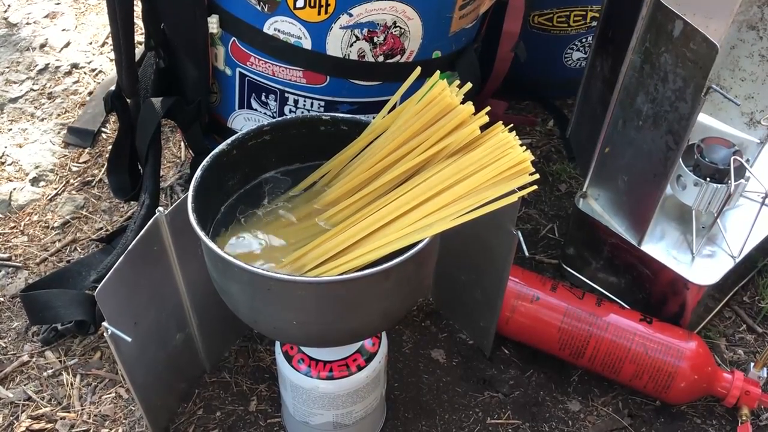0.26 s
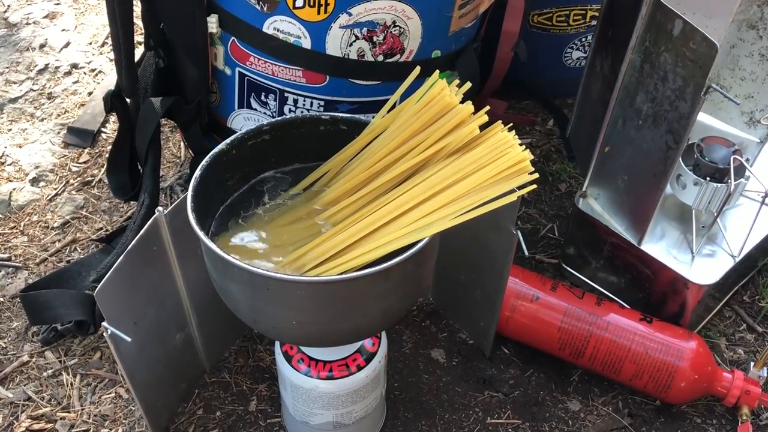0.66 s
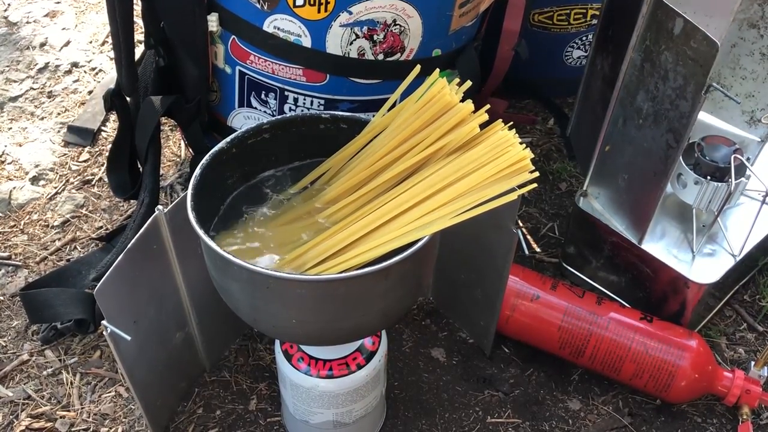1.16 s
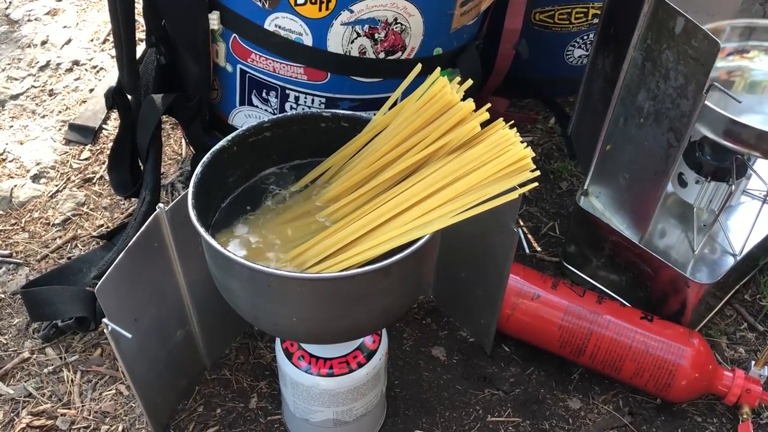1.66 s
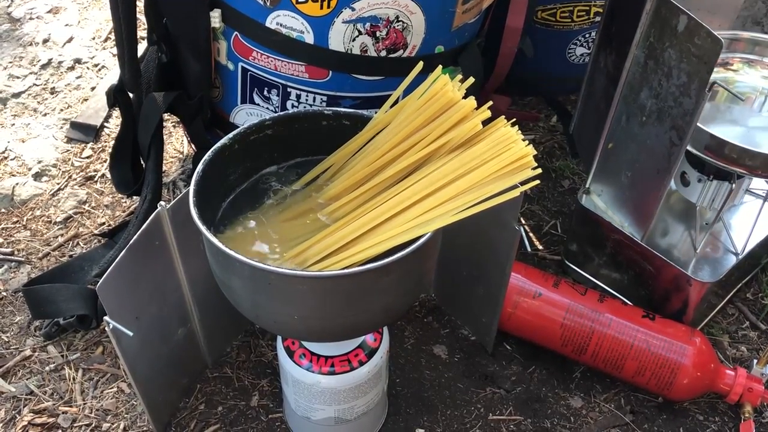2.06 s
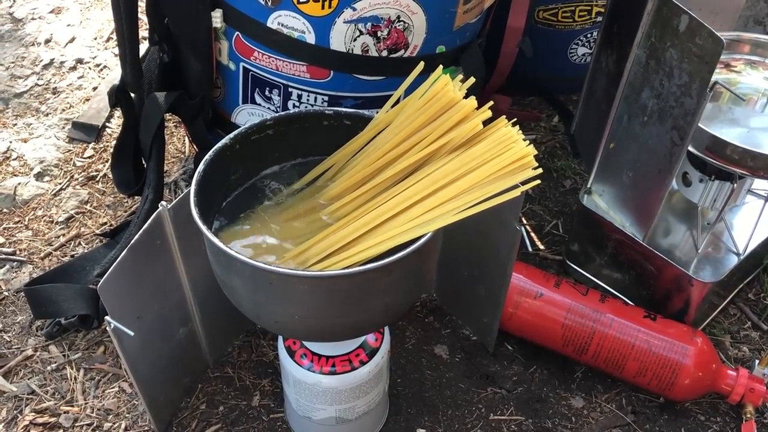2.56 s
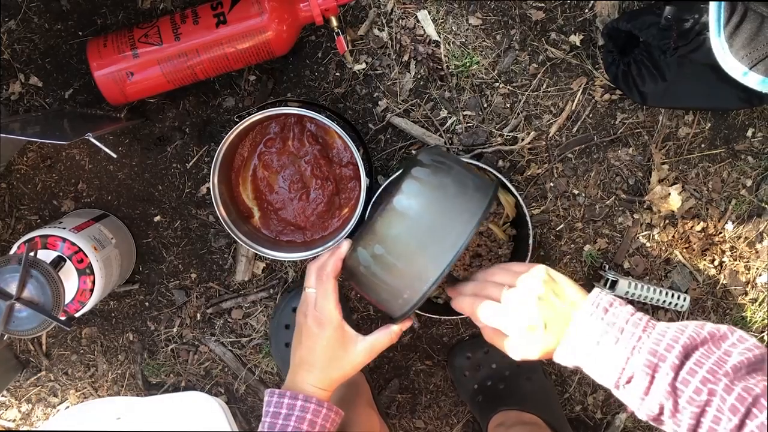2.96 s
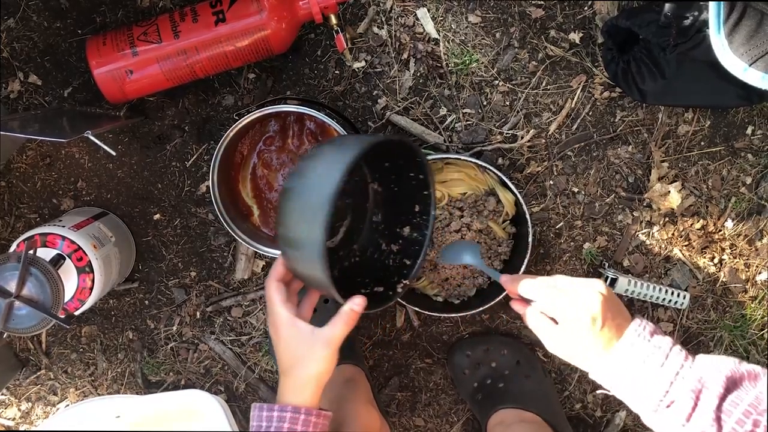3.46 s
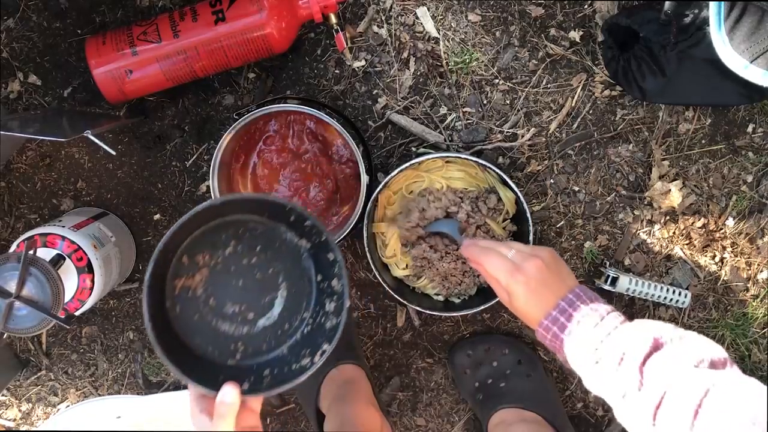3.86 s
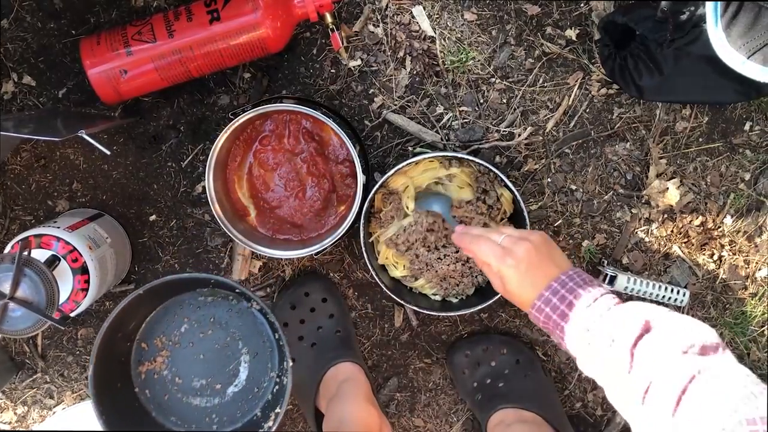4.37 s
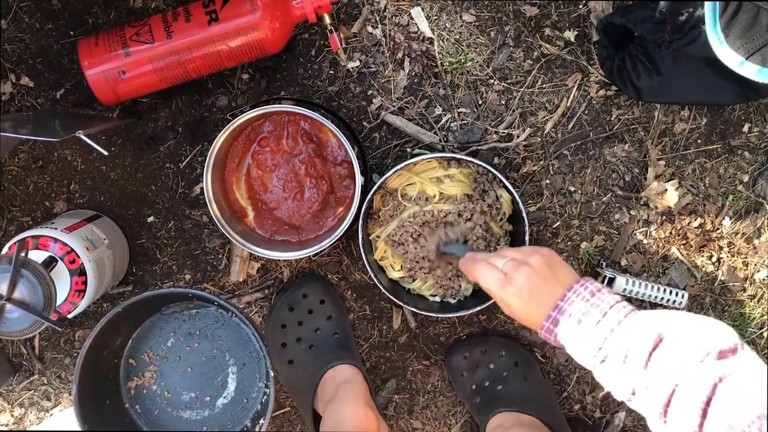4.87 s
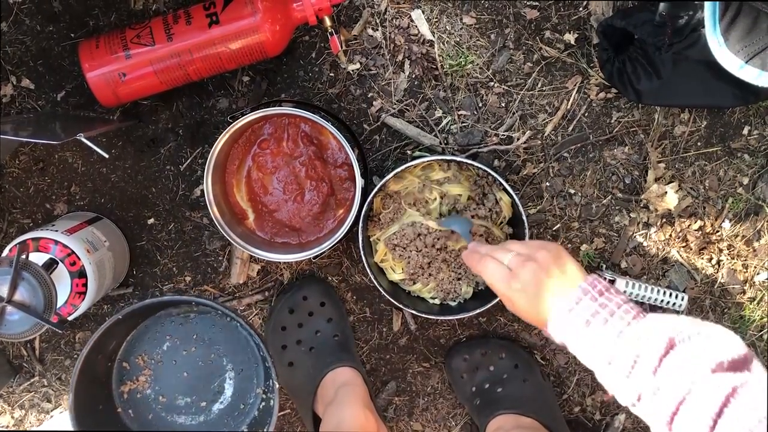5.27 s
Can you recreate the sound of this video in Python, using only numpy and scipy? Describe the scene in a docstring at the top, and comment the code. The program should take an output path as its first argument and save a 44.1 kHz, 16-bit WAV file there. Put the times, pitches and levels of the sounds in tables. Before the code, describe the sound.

A camp stove burns with a steady, hissing roar under a pot of faintly simmering water. Its foil windscreen is knocked and gives a short, crisp rattle. The flame then turns abruptly louder and brighter as the bubbling stops. A spoon scrapes a thin steel pot, knocks it once with a brief ring, and ticks lightly in the food. The sound is close, outdoors, with no echo.

```python
"""Camp stove and steel pot

A liquid-fuel stove roars under a pot of bubbling water. Its foil windscreen shifts, then is knocked
and rattles. Next we listen from above, where the flame is louder: a spoon scrapes the thin steel pot,
knocks it once so that it rings, and ticks about in the food. Open ground, no walls, almost mono."""
import sys
import numpy as np
from scipy import signal
from scipy.fft import rfft, irfft, next_fast_len
from scipy.io import wavfile

SR = 44100
rng = np.random.default_rng(int(sys.argv[2]) if len(sys.argv) > 2 else 0)


def unload_audio(sound):
    """Save the sound as a 16-bit wav file, at the path given as the first command line argument."""
    columns = np.transpose(np.atleast_2d(sound))
    # keep every value between -1 and 1, then stretch to whole-number steps
    steps = np.round(np.clip(columns, -1, 1) * 32767)
    wavfile.write(sys.argv[1], SR, steps.astype(np.int16))


N = 243431
SCENE_CHANGE_S = 2.706   # when the scene changes to a second spot, above the stove

# The tones the steel pot rings with. Each row: pitch in Hz, strength in dB when struck,
# strength in dB when scraped, seconds to fade by 60 dB.
POT_TONES = [(1616, -8, -4, 0.089), (2387, -15, -1.5, 0.17), (3132, -3, 1.5, 0.16), (3836, -16, -3, 0.14),
             (4560, -31, -7, 0.079), (5180, -15, -17, 0.058), (6040, -10, -15, 0.033),
             (6800, -12, -21, .05), (7520, -5, -23, 0.058), (7610, -7, -13, 0.043), (8455, -6, -19, 0.032),
             (8900, -16, -16, .05), (9400, -22, -19, .045), (10640, -3, -30, 0.027),
             (13090, -14, -40, .025), (14430, -14, -40, .025)]


def amp(db):
    """Turn decibels into a number to multiply by."""
    return 10 ** (np.asarray(db) / 20)


def rms_one(x):
    """Scale a signal so that its average level (rms) is 1."""
    return x / np.sqrt(np.mean(x ** 2) + 1e-20)


def filtered(x, kind, hz, order=2):
    """Keep the part of a sound that is "low", "high" or in a "band"."""
    return signal.sosfilt(signal.butter(order, hz, kind, fs=SR, output="sos"), x)


def coloured(noise, slope, bumps=()):
    """Shape noise with a broad tone curve plus peaks and dips; the result has level 1."""
    size, top_hz = next_fast_len(N), 15850
    hz = np.arange(1, size // 2 + 2) * SR / size
    slope_hz, slope_db = np.array(slope).T
    level_db = np.interp(np.log(hz), np.log(slope_hz), slope_db)
    for centre, width, boost_db in bumps:
        level_db += boost_db / (1 + (2 * (hz - centre) / width) ** 2)
    return rms_one(irfft(rfft(noise, size) * amp(level_db) * (hz < top_hz), size)[:N])


def click(start, db):
    """A single click, start seconds in."""
    return amp(db) * (np.arange(N) == round(start * SR))


def ring(clicks, hz, fade_s):
    """Each click starts a pure tone that fades by 60 dB in fade_s seconds."""
    decay, angle = amp(-60 / (fade_s * SR)), 2 * np.pi * hz / SR
    return signal.lfilter([0, np.sin(angle)], [1, -2 * decay * np.cos(angle), decay ** 2], clicks + 1e-18)


def grains(per_s, spread):
    """Random clicks; a larger spread makes their sizes more uneven."""
    sizes = amp(spread * np.minimum(rng.exponential(1, N), 4)) * rng.choice([-1, 1], N)
    return rms_one(sizes * (rng.random(N) < per_s / SR))


def drift(rate):
    """A smooth random wobble of size about 1, changing about rate times a second."""
    decay = np.exp(-80 * np.pi * rate / SR)
    slow = signal.lfilter([1], [1, -2 * decay, decay ** 2], rng.standard_normal(N // 40 + 2002))[2000:]
    return np.interp(np.arange(N) / 40, np.arange(len(slow)), rms_one(slow))


def held(start, end, rise_s, fall_s):
    """A volume curve: rises from start, holds until end, then drops 60 dB in fall_s seconds."""
    t = np.arange(N) / SR
    rise = np.clip((t - start) / max(rise_s, 1e-3), 0, 1)
    return rise ** 2 * amp(-60 * np.clip((t - end) / max(fall_s, 1e-3), 0, 3))


def turbulence(swell_db, flicker_db):
    """Noise whose treble bands swell slowly, each on its own, and flicker quickly together."""
    size = next_fast_len(N)
    flicker = drift(39)
    spectrum = rfft(rng.standard_normal(size))
    hz = np.arange(size // 2 + 1) * SR / size
    out = irfft(spectrum * (hz < 900), size)[:N]
    edges = np.geomspace(900, SR / 2, num=49)
    for low, high in zip(edges, edges[1:]):
        gain = amp(swell_db * drift(4.4) + flicker_db * (low > 2000) * flicker)
        out += rms_one(gain) * irfft(spectrum * (hz >= low) * (hz < high), size)[:N]
    return out


def flame():
    """Swirling, burning fuel makes one roar, coloured by what stands around it."""
    # The roar's broad tone with the windscreen closed, with it shifted, and from above.
    # Each row: frequency in Hz, relative level in dB.
    closed_slope = [(25, -33), (60, -17), (110, -11), (190, 0.5), (400, -17), (900, -5.5), (1600, -11),
                    (2500, -22), (5000, -24.5), (8000, -36), (12000, -39.5), (15600, -46)]
    shifted_slope = [(25, -26), (60, -15), (110, -8), (190, 0), (400, -7.5), (900, -11.5), (1600, -8.5),
                     (2500, -23), (5000, -31.5), (8000, -32.5), (12000, -39.5), (15600, -44)]
    above_slope = [(25, -41), (60, -21), (110, -20.5), (190, -12), (400, -13), (900, 1.5), (1600, -34.5),
                   (2500, -41.5), (5000, -43), (8000, -43.5), (12000, -47), (15600, -46.5)]
    # Peaks and dips from pot, foil and ground. Each row: centre in Hz, width in Hz, boost or cut in dB.
    closed_bumps = [(375, 140, 11), (515, 58, -9), (639, 56, 6.5), (848, 260, -15.5), (1450, 560, 2.5),
                    (1657, 210, -13.5), (2138, 77, 10.5), (2280, 1180, -14), (2700, 180, 7),
                    (3650, 125, -12), (6020, 560, 14.5), (6020, 2430, -13.5)]
    shifted_bumps = [(546, 93, -14.5), (673, 140, 4.5), (902, 49, -7), (1372, 33, 6), (1550, 140, -6),
                     (1924, 134, -13), (2420, 210, -14), (3010, 130, -9), (6020, 440, 8),
                     (7240, 1700, -7.5)]
    above_bumps = [(339, 100, -4.5), (406, 83, 2), (602, 94, 7), (905, 112, -15), (1144, 232, -10),
                   (1447, 62, 7.5), (1755, 300, 9.5), (2320, 480, 8), (2817, 183, 12), (3244, 404, 15),
                   (4000, 640, 11), (4940, 120, 6), (5715, 860, 13.5), (7090, 240, 7), (7630, 530, -2.5),
                   (10460, 1350, 7.5), (11100, 250, 4.5), (12600, 760, 8), (14300, 900, 3), (8750, 400, -1)]
    # Bands of roar that the pot throws back as it is turned and set down.
    # Each row: start and end in seconds, centre and width in Hz, level in dB.
    pot_echoes = [(2.5, 3.33, 1008, 129, -38), (3.145, 4.143, 1718, 150, -45),
                  (3.453, 4.9, 1380, 148, -46.5)]
    t = np.arange(N) / SR
    noise = turbulence(swell_db=1.4, flicker_db=0.97)
    shift = np.clip((t - 1.666) / 0.11, 0, 1)   # the windscreen slides to its new place
    near = (1 - shift) * coloured(noise, closed_slope, closed_bumps)
    near += shift * coloured(noise, shifted_slope, shifted_bumps)
    above = amp(-23) * coloured(noise, above_slope, above_bumps)
    echo_noise = rng.standard_normal(N)
    for start, end, hz, width, db in pot_echoes:
        band = rms_one(filtered(echo_noise, "band", [hz - width / 2, hz + width / 2]))
        above += amp(db) * held(start, end, rise_s=0.19, fall_s=0.41) * band
    second_spot = np.clip((t - SCENE_CHANGE_S) / 0.013, 0, 1)
    return (1 - second_spot) * amp(-30) * near + second_spot * above


def boiling_water():
    """Small bubbles burst and ring for a few cycles: a steady simmer with one short surge."""
    # Larger bubbles that spit. Each row: start in seconds, level in dB, pitch in Hz.
    big_bubbles = [(.151, -38, 4700), (.175, -33, 4900), (.203, -33, 4600), (.25, -37, 4700)]
    pitches = np.geomspace(3800, 6000, 12)
    pitch_choice = rng.integers(0, 12, N)
    bursts = grains(per_s=2000, spread=3.5)
    fizz = sum(ring(bursts * (pitch_choice == k), hz, fade_s=3.0 / hz) for k, hz in enumerate(pitches))
    simmer = amp(-55.5)
    surge = amp(-46.5) * held(0.032, 0.19, rise_s=0.077, fall_s=0.21)
    spits = sum(ring(click(start, db), hz, fade_s=0.012) for start, db, hz in big_bubbles)
    return spits + (simmer + surge) * rms_one(fizz) * (np.arange(N) < SCENE_CHANGE_S * SR)


def windscreen():
    """Knocked foil rattles in a quick spray of tiny snaps, and its base thuds on the ground."""
    # Knocks on the foil. Each row: start in seconds, strength in dB, rattle length in seconds,
    # lowest and highest frequency in Hz.
    knocks = [(1.8808, -11, 0.0135, 900, 16000), (1.898, -29, 0.008, 6000, 12000),
              (1.9165, -31, .011, 2500, 14000), (1.953, -41, 0.005, 4500, 8000),
              (2.1232, -31, 0.009, 3000, 15000), (1.999, -36, 0.022, 2800, 4500),
              (2.28, -39, .047, 6500, 10000), (2.1616, -25, 0.008, 3000, 13000)]
    # The tones the foil rings with. Each row: pitch in Hz, strength in dB, seconds to fade by 60 dB.
    foil_tones = [(1110, -5, 0.037), (1540, -4.5, 0.035), (1933, -9, 0.072), (2730, -7, 0.026),
                  (3340, -8, 0.094), (3680, -4, 0.016), (4990, -11, 0.057), (5500, -2.5, 0.037),
                  (5670, -7, 0.03), (6310, -3, 0.016), (7000, -6, 0.025), (7400, 1, 0.022),
                  (8250, 5, 0.015), (9000, -5, 0.022), (9900, -7, .02), (11100, -9, 0.025),
                  (13900, -10, .012)]
    # The base landing. Each row: start in seconds, strength in dB, pitch in Hz.
    landings = [(1.899, -16.5, 143), (1.911, -16, 255)]
    t, snaps = np.arange(N) / SR, np.zeros(N)
    spray = grains(per_s=18000, spread=2.0)
    for start, db, length, low_hz, high_hz in knocks:
        age = np.clip(t - start, 0, None)
        shake = (1 - np.exp(-age / 0.0005)) * np.exp(-(age / length) ** 3) / np.sqrt(length * SR)
        snaps += filtered(amp(db) * shake * spray, "band", [low_hz, high_hz])
    ringing = sum(amp(db) * ring(snaps, hz, fade_s) for hz, db, fade_s in foil_tones)
    crackle = filtered(snaps, "high", 1500)
    weak_band = signal.butter(1, [4050, 4700], "bandstop", fs=SR)   # the foil gives off little here
    crackle = signal.lfilter(*weak_band, crackle)
    thuds = sum(ring(click(start, db), hz, fade_s=0.051) for start, db, hz in landings)
    return ringing + amp(26) * crackle + filtered(thuds, "band", [115, 400])


def spoon_scrape():
    """The dragged spoon sticks and slips; the tiny clicks rasp and set the pot ringing."""
    # Strokes of the spoon. Each row: start and end in seconds, ring strength in dB,
    # lift of the higher tones in dB per octave, rasp level in dB.
    strokes = [(2.704, 2.741, -47, -2, -36), (2.745, 2.794, -56, 0.1, -45), (2.801, 2.84, -51, 12, -44),
               (2.842, 2.868, -33, 0, -42), (2.874, 2.898, -50, 12, -42), (2.925, 2.958, -51.5, -9, -39.5),
               (3.213, 3.232, -40, 5, -43), (3.237, 3.279, -43, 4, -51)]
    damping = 0.65   # share of the ring time left while the spoon touches
    touch = np.array([held(start, end, rise_s=0.0059, fall_s=0.078) for start, end, *_ in strokes])
    ring_db, lift_db, rasp_db = np.array(strokes)[:, 2:].T
    slips = filtered(grains(per_s=4500, spread=2.5), "low", 10500)   # softened by the rounded edge
    ringing = np.zeros(N)
    for hz, _, scraped_db, fade_s in POT_TONES:
        spot_db = 3.3 * drift(17)   # the spoon crosses each tone's lively and dead spots
        octaves = np.log2(hz / POT_TONES[2][0])
        pressure = amp(ring_db + lift_db * octaves) @ touch
        build_up = np.sqrt(fade_s * SR / 50)   # long rings gather more clicks
        drive = pressure * amp(scraped_db + spot_db) * slips / build_up
        ringing += ring(drive, hz, damping * fade_s)
    rasp = rms_one(filtered(grains(per_s=6500, spread=2.9), "band", [2300, 8000]))
    return ringing + (amp(rasp_db) @ touch) * rasp


def spoon_squeaks():
    """The spoon's edge squeaks on the steel with a very high, brief tone."""
    # Each row: start in seconds, level in dB.
    squeaks = [(2.77, -37), (2.8, -45)]
    tone = np.sin(2 * np.pi * 11350 * np.arange(N) / SR)
    return tone * sum(amp(db) * held(s, s + 0.005, rise_s=0.0028, fall_s=0.02) for s, db in squeaks)


def spoon_ticks():
    """Each dry tick of the spoon is a click, its bounce and a burst of noise that dies at once."""
    # Each row: start in seconds, peak level in dB, rough pitch in Hz, seconds to fade by 60 dB,
    # seconds until the bounce.
    ticks = [(3.1514, -11, 9000, .011, .00022), (3.2485, -22, 9000, .004, .00012),
             (4.1382, -13, 9000, 0.009, .00032), (4.344, -25, 7500, .004, .00014),
             (4.964, -31, 7000, .012, .00014), (5.0015, -23, 10000, 0.0044, .00033),
             (5.097, -17, 5600, 0.0042, .0003), (5.1638, -18, 7500, 0.005, .00014),
             (5.328, -13, 11500, .012, .0004), (5.4225, -24, 11000, .004, .00012)]
    length = 600   # samples
    out, t = np.zeros(N), np.arange(length) / SR
    for start, peak_db, hz, fade_s, bounce_s in ticks:
        clicks = 9.5 * (t == 0) + 10.0 * (np.abs(t - bounce_s) < 0.5 / SR)
        burst = (rng.standard_normal(length) + clicks) * amp(-60 * t / fade_s)
        burst = filtered(burst, "band", [hz / 2.5, hz * 1.6], order=3)
        first = round(start * SR)
        out[first:first + length] += amp(peak_db) * burst / np.abs(burst).max()
    return out


def pot_knock():
    """One blow rings the pot until the spoon presses on the wall again and stills it."""
    blow_s, blow_db, contact_s, press_s = 3.172, -14.5, 0.00074, 3.205
    age = np.arange(N) / SR - blow_s
    onset = np.clip(age / contact_s, 0, 1)
    blow = click(blow_s, blow_db)
    ringing = sum(amp(db) * ring(blow, hz, fade_s) for hz, db, _, fade_s in POT_TONES)
    ringing *= onset * held(0, press_s, rise_s=0, fall_s=0.11)
    crack_level = amp(blow_db - 8) * onset * amp(-60 * np.clip(age, 0, 1) / 0.038)
    crack = filtered(crack_level * rng.standard_normal(N), "high", 5000)   # many short, high tones
    return ringing + crack


def scene():
    """Every source sits in the middle; a faint noise, opposite in left and right, hisses along."""
    # The tone of that faint noise. Each row: frequency in Hz, relative level in dB.
    width_slope = [(12, -34), (20, 7), (164, 0), (693, -18), (889, -15), (1170, -26), (1310, -22),
                   (2690, -3), (3650, -16), (5690, -57), (7300, -36), (15000, -40)]
    middle = flame() + boiling_water() + windscreen()
    middle += spoon_scrape() + spoon_squeaks() + spoon_ticks() + pot_knock()
    width_noise = amp(-61) * coloured(rng.standard_normal(N), width_slope)
    return middle + width_noise * [[1], [-1]]


def record(dry):
    """The microphone's opening rings and lifts the highest treble; the very top is cut off."""
    peak_hz, width_hz, cutoff_hz = 15600, 820, 17100
    ringing = signal.lfilter(*signal.iirpeak(peak_hz, peak_hz / width_hz, fs=SR), dry)
    return signal.sosfilt(signal.cheby2(12, 70, cutoff_hz, fs=SR, output="sos"), dry + 0.66 * ringing)


dry = scene()
out = record(dry)
unload_audio(out)
```